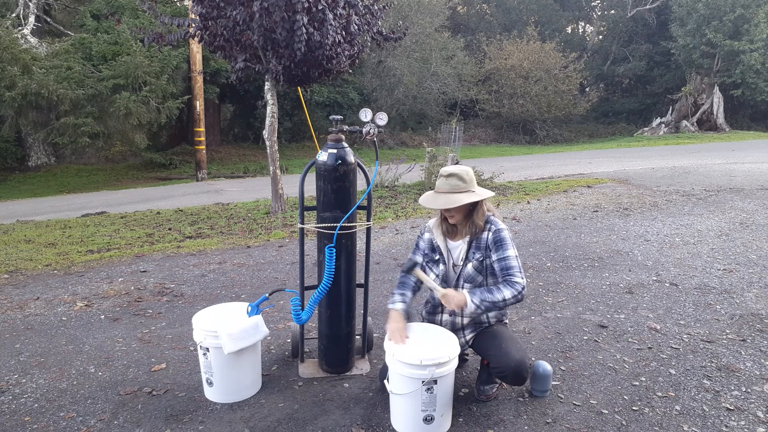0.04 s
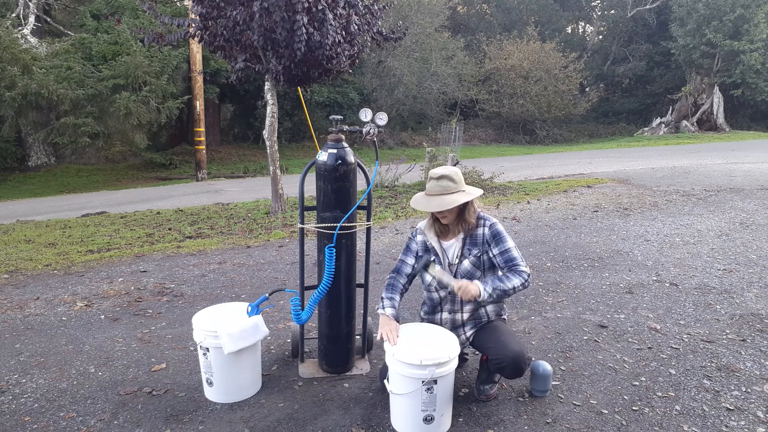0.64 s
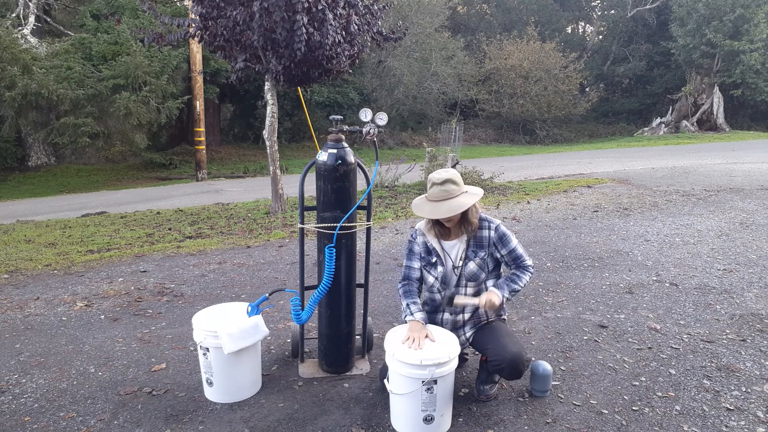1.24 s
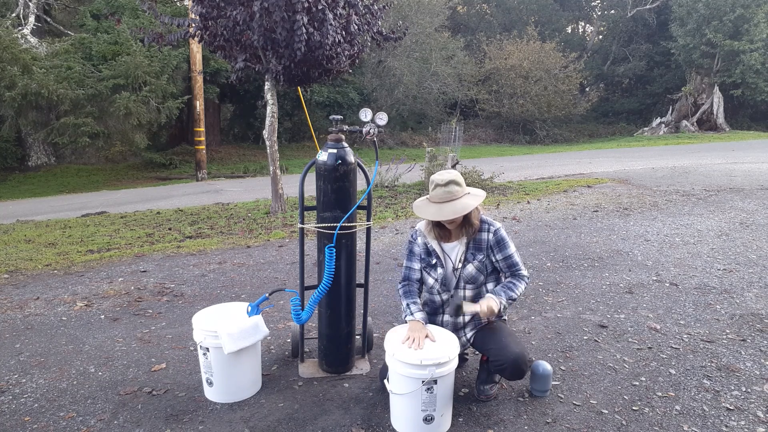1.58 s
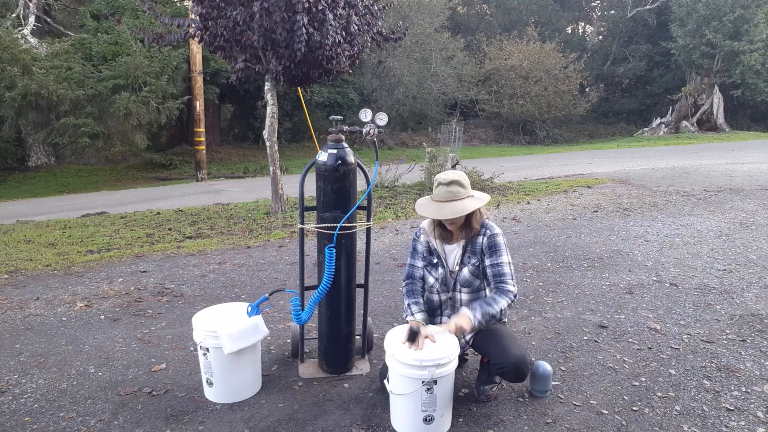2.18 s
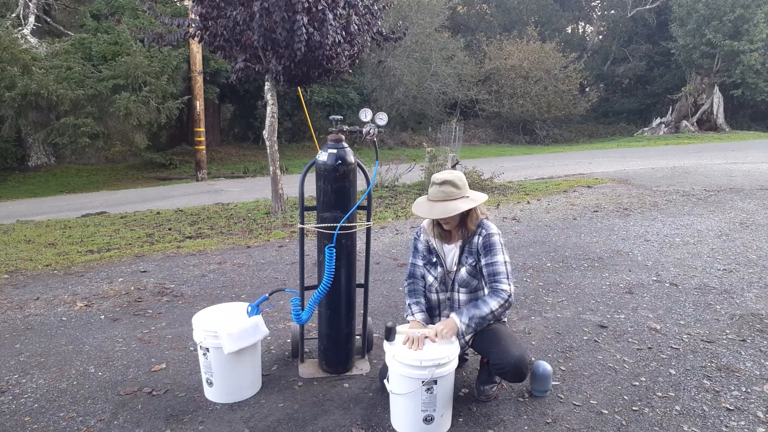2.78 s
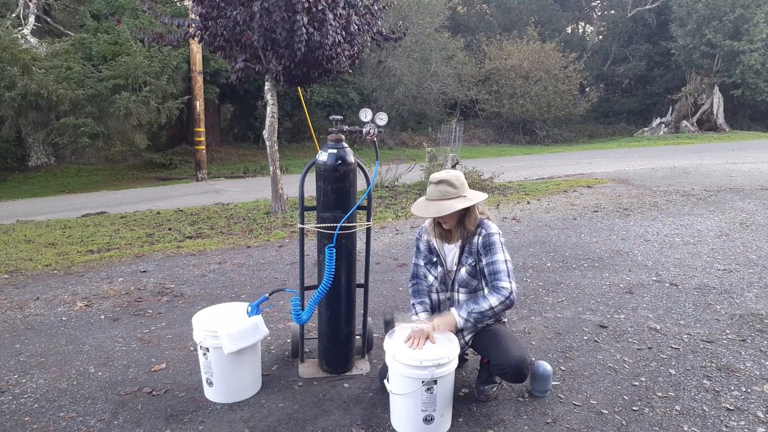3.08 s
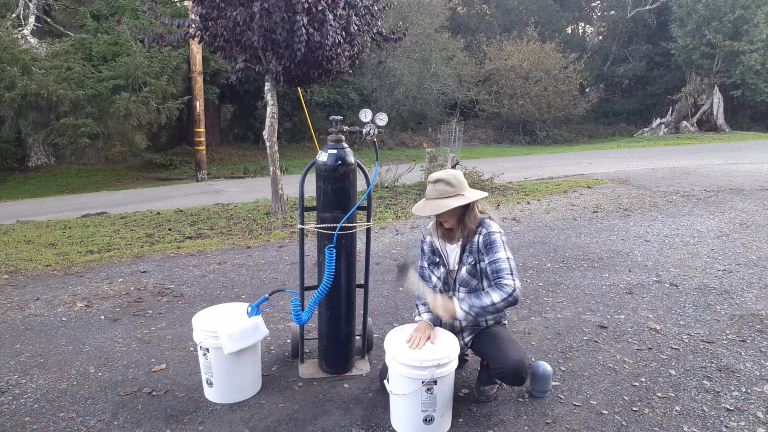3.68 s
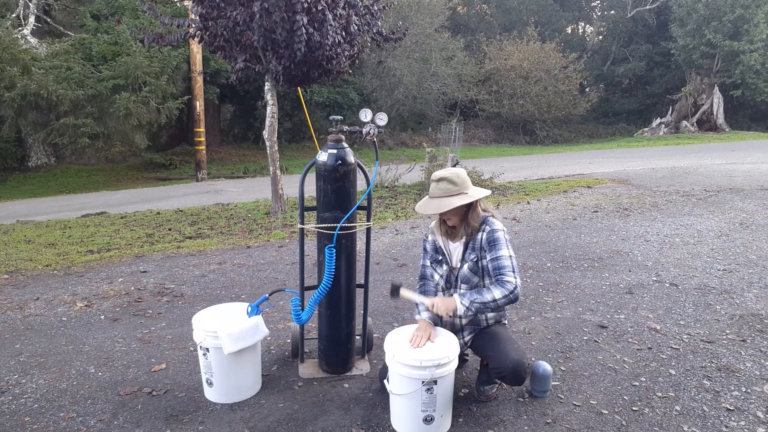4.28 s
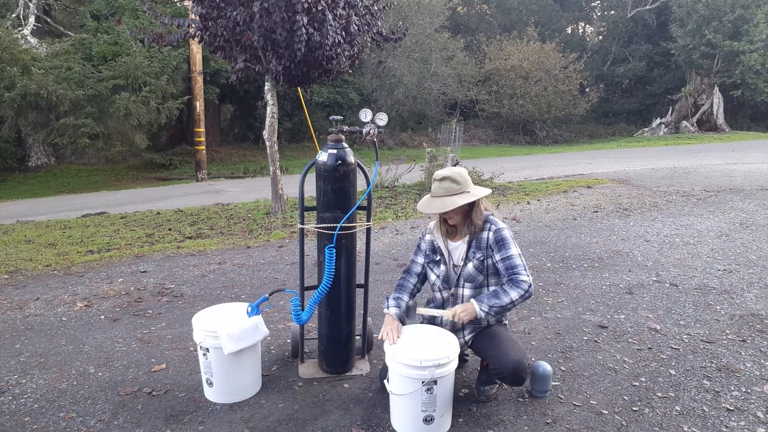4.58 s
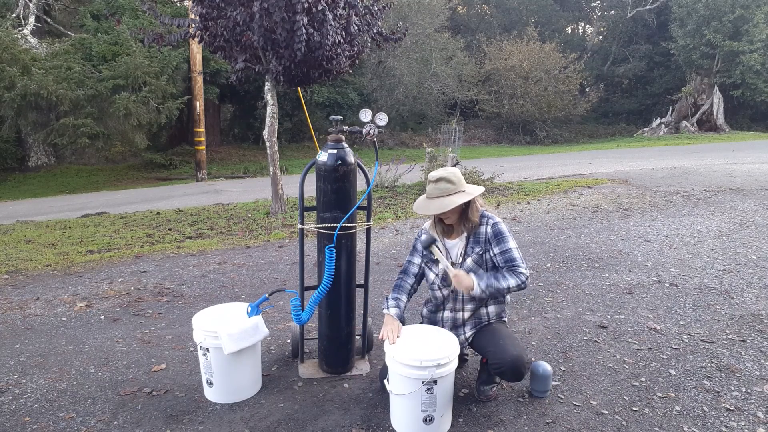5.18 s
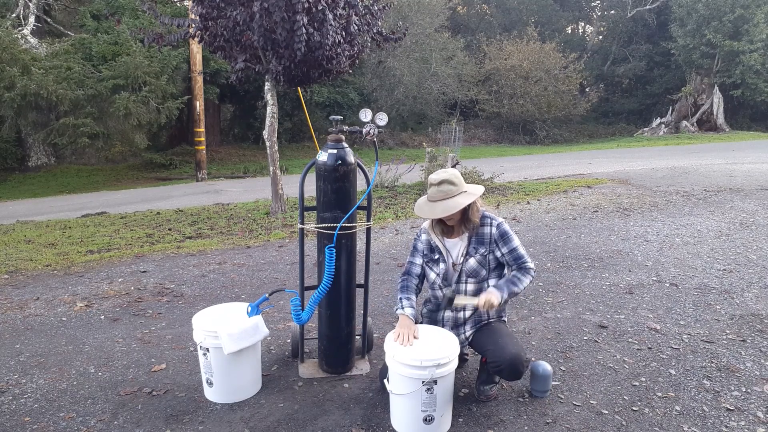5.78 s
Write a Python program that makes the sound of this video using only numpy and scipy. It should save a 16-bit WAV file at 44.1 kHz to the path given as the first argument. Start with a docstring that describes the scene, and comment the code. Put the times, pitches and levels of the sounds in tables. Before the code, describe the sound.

A mallet hammers a plastic bucket lid outdoors, each blow a loud, sharp clack with a hollow thud and a short echo from surrounding trees. The sound opens on the fading tail of a blow. From 0.6 seconds, twelve knocks follow evenly, about three a second, until 4.2 seconds, varying slightly in pitch. The first two boom a little; the rest are tighter, damped by a hand. The rim gives a few tiny bright clicks around 1.3 to 1.4 seconds. In a short pause, soft low bumps touch the microphone near 4.8 seconds. Three slower knocks, with a higher thud, land at 5.0, 5.4 and 5.8 seconds, with a faint palm swipe over the plastic near 5.5. A distant bird chirps faintly at 1.7 and 4.1 seconds. A very quiet, low motor hum runs throughout, joined by a light breeze on the microphone from about 3.3 seconds.

```python
"""A gravel yard ringed by trees, where a mallet hammers the plastic lid of a bucket shut.
Each blow flexes the lid and makes its rim chatter; the bucket booms when no hand damps the lid.
The gravel scatters the knocks and the trees throw them back. The rim clicks under the lip and a palm
hisses over the plastic. Behind it a bird whistles, a far motor hums, and the microphone catches a few
low bumps and a light breeze getting up."""
import sys
import numpy as np
from scipy import signal
from scipy.fft import rfft, irfft
from scipy.io import wavfile
from scipy.ndimage import uniform_filter1d

SR = 44100
rng = np.random.default_rng(int(sys.argv[2]) if len(sys.argv) > 2 else 0)


def pcm_store(signal):
    """Save signal as 16-bit PCM."""
    levels = np.round(np.clip(np.atleast_2d(signal), -1, 1) * 32767)
    wavfile.write(sys.argv[1], SR, levels.astype(np.int16).T)


N = 257444
TIME = np.arange(N) / SR
SIZE = 32768  # samples in one hit, tail included
HZ, AGE = np.fft.rfftfreq(SIZE, 1 / SR) + 1e-3, np.arange(SIZE) / SR  # a hit's spectrum and time axes
RUN_UP_S = .003  # fade-in ahead of each hit


# The hits; where the mallet lands tunes the lid's four modes. Each row: start in seconds, strength
# in dB, thud, knock, clack and ping pitch in Hz, then knock, ping and crack in dB against the strength.
BLOWS = [(-0.17, 26, 185, 770, 1380, 2250, 1, -10, -9), (0.561, 25.5, 195, 736, 1240, 2200, -5, -13, -13.5),
         (0.904, 24.5, 187, 687, 1456, 2256, -1.5, -3.5, -11.5),
         (1.2344, 23.5, 198, 430, 1750, 2270, 2, -5, -9), (1.5601, 20, 195, 538, 1394, 2200, 2, -6, -7.5),
         (1.8801, 24, 277, 707, 1132, 3560, -3.5, -7, -10),
         (2.2103, 22.5, 310, 606, 1144, 3370, -4.5, -8.5, -9),
         (2.5312, 21.5, 252, 540, 947, 2250, 2.5, -3, -3), (2.849, 24, 182, 590, 1440, 2261, 2.5, -1.5, -8),
         (3.1698, 21, 189, 622, 1440, 2250, -6, -18.5, -6.5),
         (3.4886, 24.5, 167, 615, 1428, 4110, 1.5, -8.5, -12.5),
         (3.818, 25.5, 171, 748, 1360, 2250, -4.5, -12, -9.5),
         (4.1958, 23, 192.4, 560, 1170, 2167, 3.5, -5.5, -4.5),
         (4.9613, 23.5, 326.5, 840, 1229, 2200, -1.5, -16.5, -8.5),
         (5.3704, 23, 355, 873, 1173, 2200, -0.5, -17, -8.5),
         (5.7749, 24.5, 340, 594, 886, 4500, -6, -14, -10.5)]
# The free hand holds the loose rim, lies flat on the lid, takes the rim as it seats, holds the seated
# lid, then leans on it. Each row: thud trim in dB, boom trim in dB, boom pitch in Hz, wall ring trim
# in dB, chatter length in seconds, crack tilt in dB per octave above 2 kHz, echo send in dB.
GRIPS = [(-3.5, 3, 137, 1, 0.0053, 3, 2.5), (-0.5, -15, 153, -4, 0.0059, 1, 2.1),
         (-4, 2.5, 132, -0.5, .003, -.5, 6.3), (-.5, 2.5, 118, 2.5, .002, -1, 3.5),
         (-4.5, -6.5, 130.5, 3.5, 0.0027, -1.15, 3)]
# When the hand moves to its next grip, in seconds.
GRIP_CHANGES_S = [1.1, 4.5, 5.2, 5.6]

def strokes(beaming=.27, usual_knock_db=23.5):
    """Voices each blow from where the mallet lands and how the free hand damps the lid."""
    for start, strength_db, thud_hz, knock_hz, clack_hz, ping_hz, knock_db, ping_db, crack_db in BLOWS:
        grip = GRIPS[np.searchsorted(GRIP_CHANGES_S, start)]
        thud_db, boom_db, boom_hz, wall_db, chatter_s, tilt_db, send_db = grip
        thud_db += 6 * np.log2(thud_hz / 200)  # a higher thud radiates better
        modes = [(thud_hz, strength_db + thud_db), (knock_hz, strength_db + knock_db),
                 (clack_hz, strength_db), (ping_hz, strength_db + ping_db)]
        # a strong knock is aimed at the microphone, so less of it scatters
        send_db -= beaming * (strength_db + knock_db - usual_knock_db)
        yield start, modes, strength_db + crack_db, tilt_db, chatter_s, send_db, boom_db, boom_hz, wall_db


# Echo colour of the gravel with things nearby, and of the trees. Each row: frequency in Hz, gain in dB.
GROUND_COLOUR = [(70, -12.5), (120, -7), (180, -8), (330, -2.5), (550, -5.5), (1200, -8), (1800, -5),
                 (2400, -5.5), (3400, -1.5), (5500, -8), (9000, -6), (15000, -9.5)]
TREES_COLOUR = [(100, -9), (300, -14), (600, -22.5), (1200, -22.5), (1800, -17), (2300, -11.5),
                (3500, -11.5), (6000, -16), (9000, -8.5), (15000, -19.5)]
# Their tails. Each row: frequency in Hz, seconds to fall 60 dB.
GROUND_T60 = [(100, 0.042), (400, .2), (1500, 0.16), (5000, .2), (14000, 0.06)]
TREES_T60 = [(100, 0.33), (400, .75), (1300, 0.77), (2500, 0.51), (5000, 0.52), (9000, 0.31), (15000, 0.18)]

def hammering(direct_db=2, right_delay_s=.00003, fresh_share=.19):
    """The mallet hits the lid: each blow arrives direct, then off the gravel, then off the trees."""
    out = np.zeros((2, N))
    ground_grain = diffuse(SIZE)
    direct_pan = lean_left(2) * np.exp(-2j * np.pi * HZ * np.array([[0], [right_delay_s]]))
    around_pan = lean_left(1.37)
    for start, modes, crack_db, tilt_db, chatter_s, send_db, boom_db, boom_hz, wall_db in strokes():
        spot = strike_spot()
        toward_mic = causal(spot * lid(modes, crack_db, tilt_db, sharpness=.94))
        direct = -amp(direct_db) * toward_mic * chatter(chatter_s)
        # the ground stays put, but each spot on the lid radiates in its own way
        grain = np.sqrt(1 - fresh_share) * ground_grain + np.sqrt(fresh_share) * diffuse(SIZE)
        ground = echoes(grain, GROUND_COLOUR, GROUND_T60, onset_s=.007, hold_s=.043, sag_db=3)
        trees = echoes(diffuse(SIZE), TREES_COLOUR, TREES_T60, onset_s=.062, hold_s=.059, sag_db=2.5)
        # summed over all directions the lid's peaks are blunter
        toward_ground = causal(np.sqrt(spot) * lid(modes, crack_db, tilt_db, sharpness=.41))
        # the ping is beamed narrowly and misses the trees
        toward_trees = causal(lid(modes[:-1], crack_db, tilt_db, sharpness=.64))
        scattered = amp(send_db) * (toward_ground * ground + toward_trees * trees)
        add(out, start - RUN_UP_S, pulse(direct_pan * direct + around_pan * scattered))
        add(out, start, around_pan * bucket(boom_db, boom_hz, wall_db))
    return out


# The broad crack of struck plastic. Each row: frequency in Hz, gain in dB.
CRACK_COLOUR = [(80, -11.5), (170, -2), (450, -35), (900, 4), (1650, -0.9), (1900, -4), (2250, 0.5),
                (2800, -6.5), (4300, -8), (6500, -12), (9500, -18), (13000, -16), (15500, -21)]
# Bandwidths of thud, knock, clack and ping in Hz, at a sharpness of 1.
MODE_WIDTHS = [160, 313, 380, 325]

def lid(modes, crack_db, tilt_db, sharpness, low_cut_hz=65):
    """Tone of the flexing lid: heavily damped modes over a broad crack."""
    treble_db = tilt_db * np.log2(np.maximum(HZ / 2000, 1))
    power = amp(crack_db + curve(CRACK_COLOUR, HZ) + treble_db) ** 2
    for (hz, db), width in zip(modes, MODE_WIDTHS):
        detuning = sharpness * (HZ - hz ** 2 / HZ) / width
        power += sharpness * (amp(db) / (1 + detuning ** 2)) ** 2
    return np.sqrt(power / (1 + (low_cut_hz / HZ) ** 4))  # a small lid radiates little deep bass


def strike_spot(spacing_hz=70, depth_db=4.5):
    """Where the mallet lands favours some of the lid's many overlapping modes and mutes others."""
    mode_number = np.cumsum(np.gradient(HZ) / (spacing_hz + .06 * HZ))
    ripple = np.interp(mode_number, np.arange(400), rng.standard_normal(400))
    gain = amp(depth_db * np.tanh(ripple) * HZ / (HZ + 400))
    return gain / np.sqrt(uniform_filter1d(gain ** 2, size=600))


def chatter(length_s, rattle=2.4, wide_above_hz=3500, slap_above_hz=600):
    """The rim slaps the bucket in a quick flurry of contacts that smears the crack in time."""
    shared, own = rng.standard_normal(SIZE), rng.standard_normal((2, SIZE))
    fade = rattle * np.exp(-(AGE / length_s) ** 4) * np.sqrt(length_s)
    # short waves leave the rim differently toward each microphone
    contacts = rfft(shared * fade) + HZ / (HZ + wide_above_hz) * rfft(own * fade)
    slaps = 1 + contacts * HZ / (HZ + slap_above_hz)
    # the contacts share the energy of the blow without changing its colour
    power = uniform_filter1d(uniform_filter1d(abs(slaps) ** 2, size=180), size=180)
    return slaps / np.sqrt(power)


# The ring of the bucket's wall and rim. Each row: pitch in Hz, level in dB, seconds to fall 60 dB.
WALL_MODES = [(197, -44.5, 0.2), (241, -35.5, .22), (297.6, -31.5, .22), (315, -35, .2), (380, -33.5, 0.15),
              (399, -31.5, .2), (444, -36, .2), (495, -34, 0.27), (600, -37, 0.18), (1222, -45.5, 0.49),
              (2290, -34.5, .22), (2120, -39, .14)]

def bucket(boom_db, boom_hz, wall_db, drum_hz=170):
    """Trapped air booms and the lid drums unless a hand stops them; the wall rings anew each hit."""
    boom = decay(boom_db - 20, t60=.16) * np.sin(2 * np.pi * boom_hz * AGE)
    drum = decay(boom_db - 31, t60=.26) * np.sin(2 * np.pi * drum_hz * AGE)
    body = boom + drum
    for hz, db, t60 in WALL_MODES:
        detune, accent, phase = rng.standard_normal(3)
        wave = np.sin(2 * np.pi * (hz * (1 + .0046 * detune) * AGE + phase))
        body += decay(wall_db + db + 2 * accent, t60) * wave
    return body * (1 - np.exp(-AGE / .012))  # swells in behind the crack


def echoes(grain, colour, t60s, onset_s, hold_s, sag_db):
    """Spectrum of a wash of dense echoes: they set in, sag slowly, then each band dies away."""
    hz, t, bands = signal.stft(grain, SR, nperseg=256)
    fall_db = 60 * np.maximum(t - hold_s, 0) / curve(t60s, hz)[:, None]
    envelope = amp(-sag_db * np.minimum(t / hold_s, 1) - fall_db)
    envelope /= np.sqrt((envelope ** 2).sum(1, keepdims=True) * t[1] * SR)  # equal energy in each band
    tail = signal.istft(bands * envelope, SR, nperseg=256)[1][:, :SIZE]
    fade_in = 1 - np.exp(-(AGE / onset_s) ** 2)
    return amp(curve(colour, HZ)) * rfft(tail * fade_in)


# The rim catching under the bucket's lip. Each row: start in seconds, level in dB.
CLICKS = [(1.3044, -28), (1.3538, -33), (1.3843, -33), (1.4044, -41)]

def rim_clicks(ping_hz=2260, attack_s=.00096):
    """The rim snaps home in small bright ticks, each with a short ping."""
    out = np.zeros((2, N))
    bright = signal.butter(1, [3500, 13000], "band", fs=SR)
    for start, db in CLICKS:
        tick = decay(db - 13, t60=.054) * signal.lfilter(*bright, diffuse(SIZE))
        ping = decay(db - 7, t60=.07) * np.sin(2 * np.pi * ping_hz * AGE)
        add(out, start, (tick + ping) * (1 - np.exp(-AGE / attack_s)))
    return out


# The palm's swipes over the lid. Each row: midpoint in seconds, length in seconds, level in dB.
SLIDES = [(1.102, 0.091, -60), (4.45, 0.24, -67), (5.456, 0.095, -43.5), (5.652, 0.085, -72)]
# The colour of their hiss. Each row: frequency in Hz, gain in dB.
SLIDE_COLOUR = [(500, -1), (2000, 5), (3300, 3.5), (5000, -3), (9000, -5.5), (13500, -5), (16000, -10)]

def palm(grain_db=3):
    """Skin hisses over the plastic, catching unevenly."""
    swipes = sum(amp(db) * np.exp(-(2 * (TIME - middle) / length) ** 2) for middle, length, db in SLIDES)
    catches = unit_rms(uniform_filter1d(rng.standard_normal(N), size=200))
    return swipes * amp(grain_db * catches) * noise(SLIDE_COLOUR)


# Low bumps at the microphone. Each row: start in seconds, pitch in Hz, level in dB.
BUMPS = [(4.52, 80, -55), (4.631, 79.8, -56), (4.755, 85, -48), (4.803, 84.8, -37.5), (4.836, 124, -40),
         (4.878, 121, -44.5), (4.909, 62, -45.5), (5.691, 90.5, -40)]

def bumps(rise_cycles=.7):
    """Soft low bumps, each a swing or two of air that swells and dies."""
    out = np.zeros((2, N))
    for start, hz, db in BUMPS:
        rise = hz * AGE / rise_cycles
        envelope = amp(db) * (rise * np.exp(1 - rise)) ** 2
        add(out, start, envelope * np.sin(2 * np.pi * (hz * AGE + rng.random())))
    return out * lean_left(1.5)


# The bird's calls. Each row: start in seconds, length in seconds, top pitch in Hz, level in dB.
CHIRPS = [(0.228, .05, 7700, -88), (.29, .045, 7200, -88), (.35, 0.037, 6800, -89),
          (1.744, 0.057, 3500, -58), (4.112, 0.054, 3670, -59.5)]

def bird(arch=.11):
    """A distant bird gives short whistles that arch up in pitch and back down."""
    out = np.zeros((2, N))
    for start, length, top_hz, db in CHIRPS:
        angle = np.pi * np.minimum(AGE / length, 1)
        waver = unit_rms(uniform_filter1d(rng.standard_normal((2, SIZE)), size=40))
        hz = top_hz * (1 - arch * np.cos(angle) ** 2 + .014 * waver)
        whistle = np.sin(2 * np.pi * np.cumsum(hz, axis=1) / SR)
        add(out, start, amp(db) * np.sin(angle) * whistle)
    return out


def motor(db=-59, hz=69.7):
    """A far motor hums on one low note, its level wavering slightly."""
    wobbles = [np.sin(2 * np.pi * (rate * TIME + rng.random())) for rate in np.geomspace(.3, 5, 12)]
    waver_db = unit_rms(sum(wobbles))
    return amp(db + waver_db) * np.sin(2 * np.pi * hz * TIME)


# The rumble of wind. Each row: frequency in Hz, gain in dB.
WIND_COLOUR = [(20, -5), (45, -6.5), (80, 1.5), (130, -11), (220, -18), (450, -27), (1500, -69)]

def breeze(db=-57.5, start_s=3.3, rise_s=.45):
    """A light breeze gets up on the microphone and then holds."""
    return amp(db) * np.clip((TIME - start_s) / rise_s, 0, 1) * noise(WIND_COLOUR)


# The yard's air tone. Each row: frequency in Hz, gain in dB.
AIR_COLOUR = [(25, -16.5), (60, 2.5), (130, -3), (300, -14), (600, -31), (1300, -24.5), (3000, -37.5),
              (8000, -43.5), (16000, -39.5)]

def air(db=-69):
    """A steady bed of quiet outdoor air."""
    return amp(db) * noise(AIR_COLOUR)


# The stereo width of diffuse sound. Each row: frequency in Hz, left-right likeness (1 is mono).
LIKENESS = [(60, 1), (150, 1), (300, 0.77), (640, 0.85), (1400, 0), (15000, 0.024)]

def diffuse(size):
    """White noise from all sides: alike at both microphones only in the lows."""
    left, other = rfft(rng.standard_normal((2, size)))
    likeness = curve(LIKENESS, np.fft.rfftfreq(size, 1 / SR))
    right = likeness * left + np.sqrt(1 - likeness ** 2) * other
    return irfft(np.array([left, right]), size)


def noise(colour):
    """Steady diffuse noise of a given colour, at rms 1."""
    gain = amp(curve(colour, np.fft.rfftfreq(N, 1 / SR)))
    return unit_rms(irfft(rfft(diffuse(N)) * gain, N))


def causal(gain):
    """Spectrum of the tightest attack that has this gain curve (minimum phase)."""
    log_gain = np.log(np.maximum(gain, 1e-5))
    mirrored = np.concatenate([log_gain, log_gain[-2:0:-1]])
    return np.exp(np.conj(signal.hilbert(mirrored)))[:len(gain)]


def pulse(spectrum):
    """Turns a spectrum into a hit that lands after the run-up and fades to nothing."""
    sound = irfft(spectrum * np.exp(-2j * np.pi * HZ * RUN_UP_S))
    fade_in = np.minimum(AGE / RUN_UP_S, 1) ** 2
    fade_out = np.clip(10 * (1 - AGE / AGE[-1]) - 1, 0, 1)
    return sound * fade_in * fade_out


def amp(db):
    """Decibels to gain."""
    return 10 ** (np.asarray(db) / 20)


def decay(db, t60):
    """An envelope that starts at db and falls 60 dB in t60 seconds."""
    return amp(db - 60 * AGE / t60)


def lean_left(db):
    """Pan gains: left up and right down by db."""
    return amp([[db], [-db]])


def unit_rms(x):
    """Scales to rms 1."""
    return x / np.sqrt(np.mean(x ** 2) + 1e-20)


def curve(points, hz):
    """Reads a table on a log-frequency axis."""
    point_hz, values = np.transpose(points)
    return np.interp(np.log(hz + 1), np.log(point_hz + 1), values)


def add(mix, start_s, sound):
    """Lays a sound into the mix, trimming what hangs over either end."""
    start = round(start_s * SR)
    sound = sound[..., max(-start, 0):]
    part = mix[:, max(start, 0):][:, :sound.shape[-1]]
    part += sound[..., :part.shape[1]]


def scene():
    """The work on the bucket, the bumps and the bird, over a bed of hum, breeze and air."""
    events = hammering() + rim_clicks() + palm() + bumps() + bird()
    return events + (motor() + breeze() + air()) * lean_left(1.4)


def record(dry):
    """Rounds off the loudest peaks near full scale, then cuts below 50 Hz and above 16 kHz."""
    rounded = dry / (1 + dry ** 6) ** (1 / 6)
    low_cut = signal.butter(2, 50, "high", fs=SR)
    low_pass = signal.firwin(255, 16000, window=("kaiser", 9), fs=SR)
    return signal.oaconvolve(signal.lfilter(*low_cut, rounded), low_pass[None], "same")


dry = scene()
out = record(dry)
pcm_store(out)
```